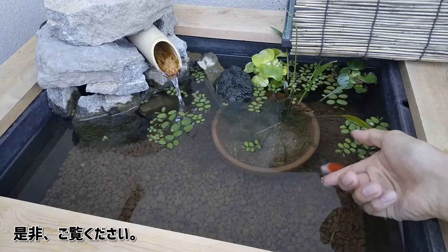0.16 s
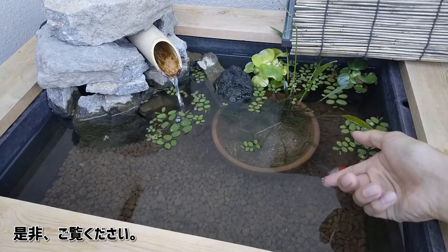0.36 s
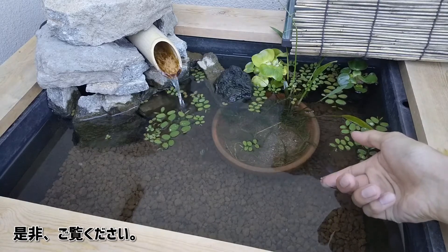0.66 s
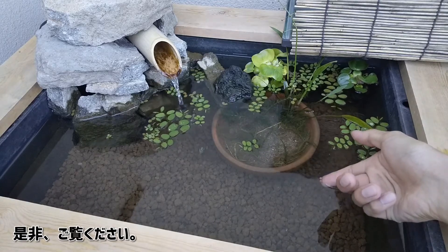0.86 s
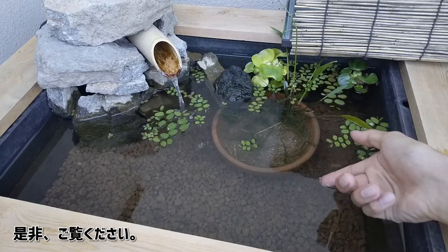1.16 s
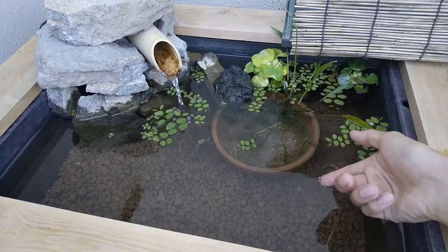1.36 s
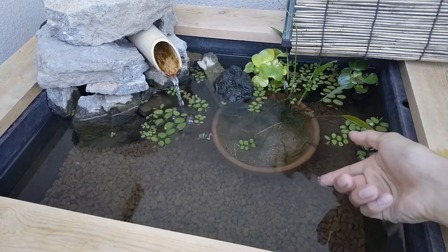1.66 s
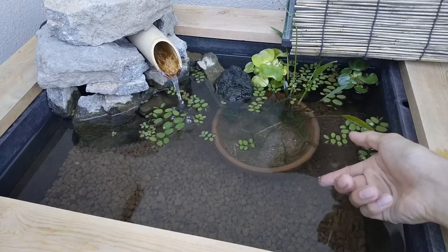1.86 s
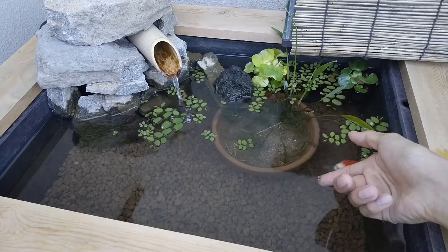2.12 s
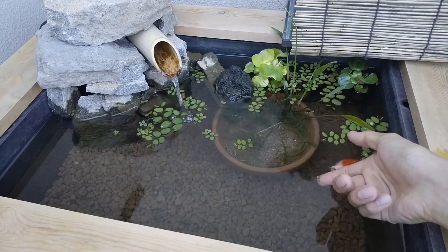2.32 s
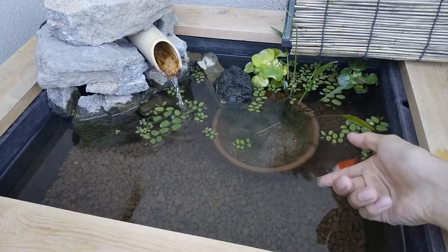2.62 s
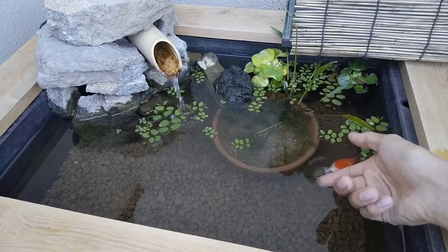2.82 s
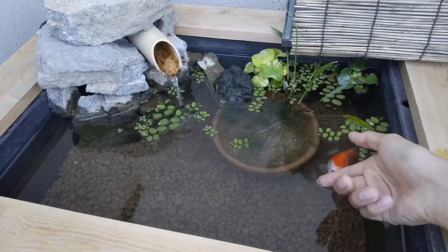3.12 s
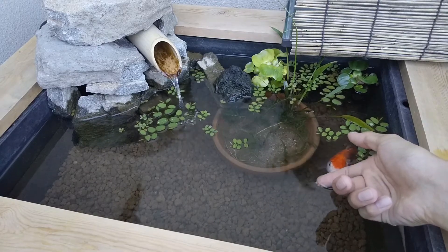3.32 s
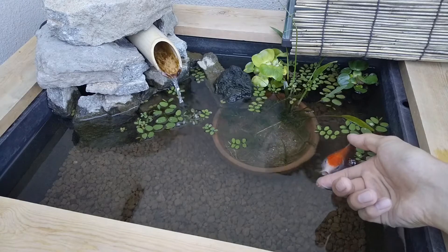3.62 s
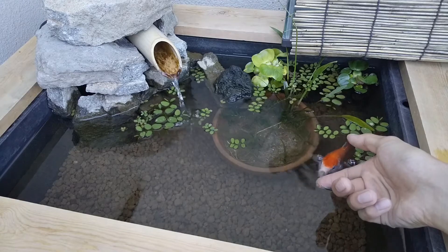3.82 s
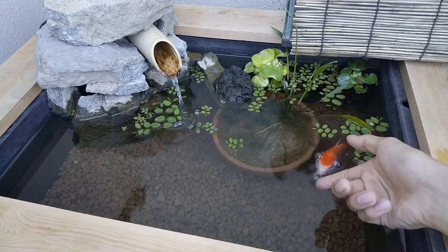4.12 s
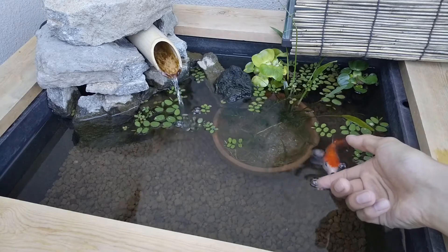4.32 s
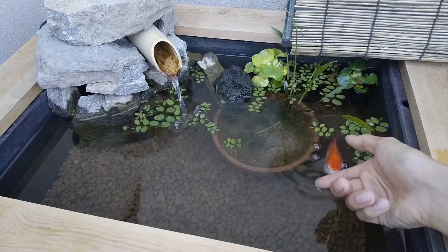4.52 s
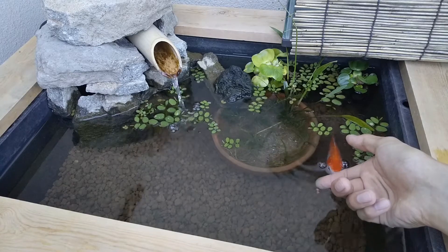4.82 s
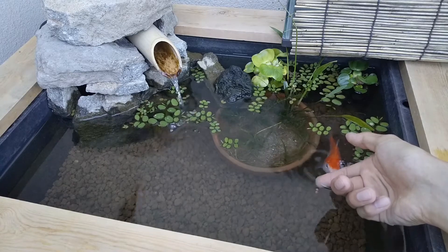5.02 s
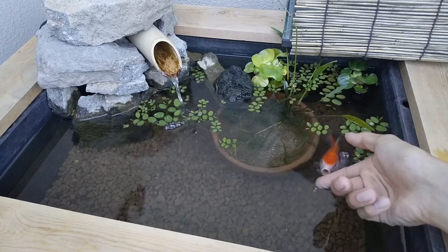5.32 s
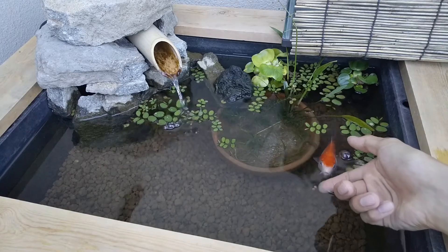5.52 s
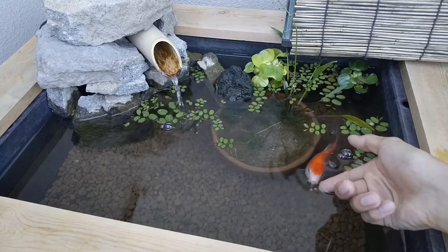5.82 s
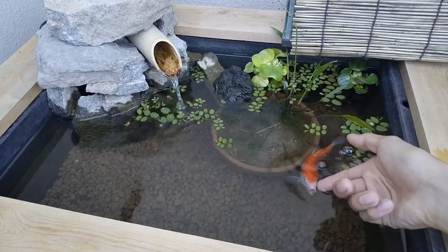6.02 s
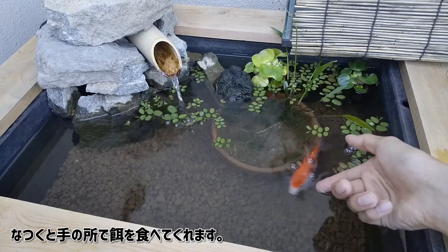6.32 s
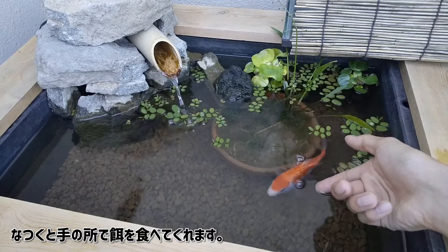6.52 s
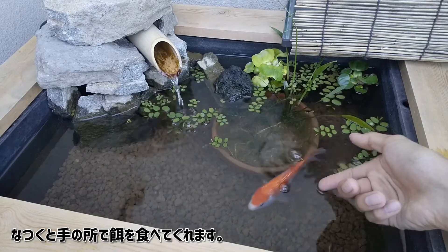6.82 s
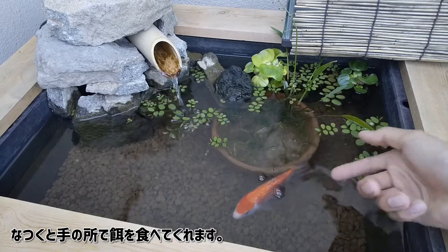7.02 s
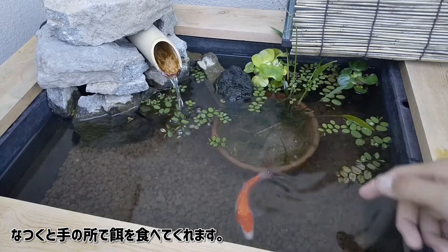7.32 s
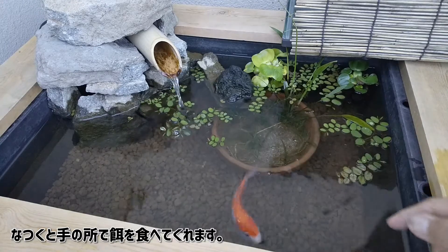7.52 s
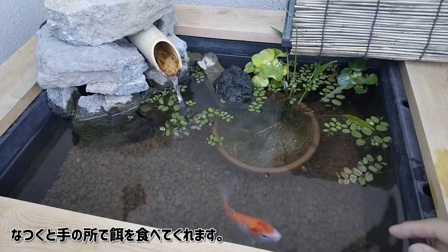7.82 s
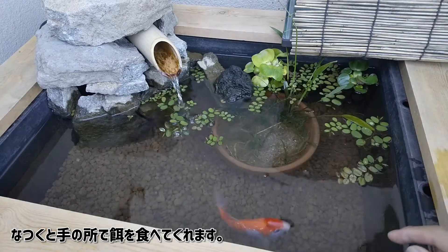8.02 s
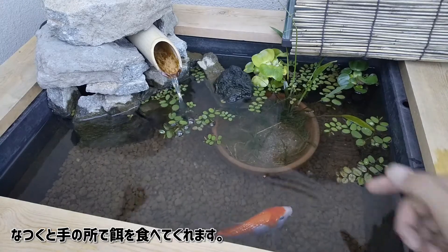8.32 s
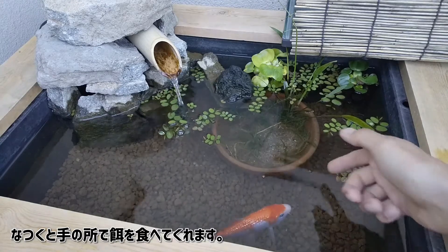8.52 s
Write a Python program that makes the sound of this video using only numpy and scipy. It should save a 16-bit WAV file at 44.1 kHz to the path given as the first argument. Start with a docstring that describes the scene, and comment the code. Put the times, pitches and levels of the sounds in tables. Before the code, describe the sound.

Close to a small garden pond, a thin stream falls continuously from a spout, with bright ringing bubble plinks, tiny wet snaps and fine spray. A deep machine hum and wind rumble lie underneath. Around the middle, a gust hits the microphone with a heavy low thump while a faint far-off vehicle accelerates and changes gear. The water never stops; wind pulses return towards the end.

```python
"""Garden pond under a spout

Close by, a thin stream falls into a small pond: ringing bubbles plink, noise bursts make snaps and spray.
Two floating bubbles burst; resonances and noise-like echo tails stand for hollows, pond walls and yard.
A nearby machine hums in sines; shaped noise and slow pulses buffet the microphone, once with a thump.
Far off, a vehicle made of engine orders accelerates and changes gear over filtered outdoor noise."""
import sys
import numpy as np
from scipy import signal
from scipy.fft import rfft, irfft, next_fast_len
from scipy.io import wavfile
from scipy.ndimage import map_coordinates

SR = 44100
rng = np.random.default_rng(int(sys.argv[2]) if len(sys.argv) > 2 else 0)


def output_pcm(signal):
    """Save a mono or channel-first signal as 16-bit PCM at the path in sys.argv[1].

    Samples are clipped to [-1, 1] before scaling.
    """
    pcm = np.clip(np.atleast_2d(signal).T, -1, 1) * 32767
    wavfile.write(sys.argv[1], SR, np.round(pcm).astype(np.int16))


N = 381906  # length in samples


def amp(db):
    """Amplitude factor of a level in dB."""
    return 10 ** (np.asarray(db) / 20)


def unit(x):
    """x at rms 1."""
    return x / np.sqrt(np.mean(x ** 2) + 1e-20)


def along(points, hz):
    """Value at hz, interpolated between (f/Hz, value) points on a log frequency axis."""
    f, value = np.transpose(points)
    return np.interp(np.log(hz + 1), np.log(f + 1), value)


def wobble(rate):
    """A smooth random curve with rate knots a second."""
    knots = rng.standard_normal(int(N * rate / SR) + 4)
    return map_coordinates(knots, [np.arange(N) * rate / SR])


def filtered(x, response):
    """x times a response of frequency."""
    m = next_fast_len(N + SR // 2)
    return irfft(rfft(x, m) * response(np.fft.rfftfreq(m, 1 / SR)), m)[:N]


def coloured(x, spectrum):
    """x through a causal filter with this spectrum, at rms 1."""
    m = 2 * next_fast_len(N // 2 + SR // 2)
    gain = amp(along(spectrum, np.fft.rfftfreq(m, 1 / SR)))
    # folding the cepstrum forward in time makes the filter minimum-phase
    cepstrum = irfft(np.log(gain))
    cepstrum[1:m // 2] *= 2
    cepstrum[m // 2 + 1:] = 0
    return unit(irfft(rfft(x, m) * np.exp(rfft(cepstrum)))[:N])


def placed(times, grains):
    """The sum of short sounds, one a row, each started at its time."""
    starts = np.round(np.abs(times) * SR).astype(int)
    index = starts[:, None] + np.arange(grains.shape[1])
    return np.bincount(index.ravel(), grains.ravel(), N)[:N]


def plinks(times, db, hz, t60, rise, onset_cycles, size=1300):
    """Ringing bubbles; each climbs in pitch as it nears the surface."""
    t = np.arange(size) / SR
    hz, age = hz[:, None], t / t60[:, None]
    pitch = hz * (1 + rise * (np.minimum(age, 1) - 1 / 8))
    phase = 2 * np.pi * np.cumsum(pitch, axis=1) / SR
    decay = np.exp(-np.log(1000) * age)
    shape = decay * (1 - np.exp(-t * hz / onset_cycles))
    shape /= shape.max(axis=1, keepdims=True)
    return placed(times, amp(db)[:, None] * shape * np.sin(phase))


def snaps(times, db, t60, size=400):
    """Tiny decaying bursts of noise where the surface breaks."""
    decay = np.exp(-np.log(1000) * np.arange(size) / SR / t60)
    return placed(times, amp(db)[:, None] * decay * rng.standard_normal((len(times), size)))


def spread_times(count):
    """Random moments without long pauses, as the stream never stops."""
    return (np.arange(count) + rng.random(count)) / count * N / SR


def splash_times(blobs, count, spread):
    """Moments just after randomly chosen falling blobs, spread seconds later on average."""
    return rng.choice(blobs, count) + rng.exponential(spread, count)


# colour of the distant background: f/Hz, relative level/dB
OUTDOOR_COLOUR = [(41, -24), (70, -0.5), (83, -12), (102, -16.5), (163, -17.5), (291, -18.5), (678, -28),
                  (1160, -30), (1790, -36), (2540, -38.5), (3190, -45), (4000, -41), (6050, -51),
                  (7910, -55.5), (9730, -59), (12600, -90), (21400, -120)]


def outdoors():
    """The steady murk of distant traffic and air: coloured noise with a slight waver."""
    level_db = -56.5 + 0.92 * wobble(3.15)
    return amp(level_db) * coloured(rng.standard_normal(N), OUTDOOR_COLOUR)


# resonances of the exhaust: f/Hz, relative level/dB
EXHAUST_COLOUR = [(120, -29), (178, -8), (205, -9), (220, 3.5), (265, -15.5), (315, -6), (360, 1),
                  (395, -7.5), (440, -27)]
PASS_S, PASS_DB, PASS_FADE_DB = 4.88, -59, 13  # nearest moment, gain there, loss one second away
SHIFT_S, SHIFT_HALF_S, SHIFT_DIP_DB = 4.965, 0.12, 17  # middle of the gear change, half its span, dip there
# engine cycle rate in Hz and its climb in Hz/s, each gear's line taken at the middle of the change
LOW_GEAR_HZ, LOW_GEAR_HZ_PER_S = 46.05, 4.4
HIGH_GEAR_HZ, HIGH_GEAR_HZ_PER_S = 34.87, 1.599


def vehicle():
    """A far engine climbs, shifts up with the throttle shut and climbs again; orders slide through resonances."""
    t = np.arange(N) / SR
    since = t - SHIFT_S
    shifted = np.clip(.5 + since / SHIFT_HALF_S / 2, 0, 1)
    low_gear = LOW_GEAR_HZ + LOW_GEAR_HZ_PER_S * since
    high_gear = HIGH_GEAR_HZ + HIGH_GEAR_HZ_PER_S * since
    rate = (1 - shifted) * low_gear + shifted * high_gear
    passing_db = PASS_DB - PASS_FADE_DB * (t - PASS_S) ** 2
    dip_db = SHIFT_DIP_DB * np.exp(-(since / SHIFT_HALF_S) ** 2)
    phase = 2 * np.pi * np.cumsum(rate) / SR
    orders = np.zeros(N)
    for k in range(4, 13):
        order_db = along(EXHAUST_COLOUR, k * rate) + 1.2 * wobble(7)
        orders += amp(order_db) * np.sin(k * phase + rng.uniform(0, 2 * np.pi))
    return amp(passing_db - dip_db) * orders


# lines of the machine: f/Hz, rms level/dB before the slow swing and random waver
HUM_LINES = [(41.8, -48.5), (55.3, -46), (98.3, -69), (119.8, -64), (418, -85.5)]
# slow swing of the hum, which sinks and recovers: t/s, gain/dB
HUM_SWING = [(0, 0.5), (3.2, -3), (4.1, -5.5), (5.5, -2), (8.66, 0)]


def machine():
    """Slightly unsteady sine lines from nearby; the two lowest beat against each other."""
    swing_db = np.interp(np.arange(N) / SR, *np.transpose(HUM_SWING))
    lines = np.zeros(N)
    for hz, db in HUM_LINES:
        level = amp(db + 2.15 * wobble(3.029))
        phase = 2 * np.pi * np.cumsum(hz + 0.303 * wobble(2.07)) / SR
        lines += level * np.sin(phase)
    return np.sqrt(2) * amp(swing_db) * lines


# colour of wind noise at the microphone: f/Hz, relative level/dB
BUFFET_COLOUR = [(6, 13.5), (14, 5), (25, 5.5), (40, -13.5), (65, -14), (100, -27.5), (200, -49.5),
                 (500, -95), (1500, -140)]
# gusts: t/s of the peak, relative level/dB there, time/s to swell or die by about 9 dB
GUST_SWELLS = [(2.409, -33, 0.0051), (2.93, -34, 0.14), (5.04, -27.5, 0.18), (5.55, -38, 0.6),
               (7.12, -32, 0.28), (8.17, -31, 0.33), (8.48, -28, 0.43)]
# single eddies that hit the microphone: t/s, peak level/dB before the ripples, main f/Hz
EDDIES = [(2.372, -29.5, 51), (2.399, -23.5, 21), (4.966, -20, 15), (5, -19, 48), (5.033, -26.5, 82),
          (5.0322, -42, 300), (5.035, -16.5, 172), (5.109, -19, 27), (5.289, -28, 22), (7.11, -41, 104),
          (7.592, -22.5, 38), (8.153, -19, 30), (8.186, -25.5, 80), (8.49, -32.5, 68)]
CALM_DB = -46  # the breeze between gusts, on the same scale as the gusts
EDDY_RAGGED, EDDY_RIPPLES = 0.03, 3  # depth of the ripples on an eddy; ripple knots per cycle of it


def wind():
    """Noise gusts over a light breeze; an eddy is a ragged dip of pressure between two pushes."""
    t = np.arange(N) / SR
    gusts = [amp(db) * np.exp(-np.abs(t - s) / swell) for s, db, swell in GUST_SWELLS]
    strength = np.hypot(amp(CALM_DB), np.linalg.norm(gusts, axis=0))
    buffet = amp(6) * strength * coloured(rng.standard_normal(N), BUFFET_COLOUR)
    eddies = np.zeros(N)
    for s, db, hz in EDDIES:
        square = (np.pi * hz * (t - s)) ** 2
        ripples = 1 + EDDY_RAGGED * wobble(EDDY_RIPPLES * hz)
        eddies += amp(db) * (2 * square - 1) * np.exp(-square) * ripples
    return buffet + eddies


# moment, peak level, time scales of swell and release
THUMP_S, THUMP_DB, THUMP_RISE_S, THUMP_FALL_S = 5.029, -7.5, 0.019, 0.0433


def thump():
    """The strongest gust shoves the microphone: one slow pressure pulse with shallow suction around it."""
    since = np.arange(N) / SR - THUMP_S
    square = (since / np.where(since < 0, THUMP_RISE_S, THUMP_FALL_S)) ** 2
    return amp(THUMP_DB) * (2 * np.exp(-square) - np.exp(-square / 2 ** 2))


def scattered(x, t60, gap, count=12, size=5000):
    """Surfaces scatter sound into noise-like tails; their pattern shifts as the stream wanders."""
    t = np.arange(size) / SR
    envelope = np.exp(-np.log(1000) * t / t60) * (1 - np.exp(-t / gap))
    tails = rng.standard_normal((count, size)) * envelope
    tails /= np.linalg.norm(tails, axis=1, keepdims=True)
    # crossfade from each tail to the next
    position = np.linspace(0, count - 1, N)
    shares = np.maximum(1 - np.abs(position - np.arange(count)[:, None]), 0)
    return signal.fftconvolve(shares * x, tails, axes=1).sum(axis=0)[:N]


# resonances between the stones: f/Hz, width/Hz, gain level/dB of each at its centre
STONE_HOLLOWS = [(1050, 47, -10), (1426, 130, -2.5), (1613, 70, 0.5), (1948.5, 39, 2.5), (2540, 84, -1),
                 (3000, 55, -3), (3416, 110, -1.5), (4010, 150, -4), (4470, 130, -6), (6470, 51, -5),
                 (7260, 73, -6), (7762, 96, -7.5), (8600, 54, -3)]


def hollows(x):
    """Hollows between the stones ring with every splash: the same few resonances colour all the water."""
    def response(f):
        total = 0
        for hz, width, db in STONE_HOLLOWS:
            damping = 1j * f * width
            total = total + amp(db) * damping / (hz * hz - f * f + damping)
        return total
    return filtered(x, response)


# floating bubbles that burst: t/s, level/dB before a 4 dB lift and the colour below
FILM_BURSTS = [(6.6927, -56), (7.324, -51.5)]
# colour of a bursting film: f/Hz, gain level/dB
FILM_COLOUR = [(9000, -40), (11500, -17), (12300, 3), (14500, -5), (15500, -5)]


def pops():
    """The film of a floating bubble tears with a tiny, very high tick."""
    s, db = np.transpose(FILM_BURSTS)
    ticks = snaps(s, db + 4.0, t60=.02)
    return filtered(ticks, lambda hz: amp(along(FILM_COLOUR, hz)))


# quick runs of bubbles: t/s, length/s, first f/Hz, last f/Hz, level/dB; pitch and level then scatter
GURGLE_RUNS = [(0.034, .036, 1230, 2800, -50), (.22, .058, 2950, 3870, -57.5),
               (.298, .016, 1850, 3030, -58.5), (0.952, 0.0672, 1246, 1570, -60)]


def gurgles(count=10):
    """A trapped pocket of air sheds bubbles that tend smaller and higher, in uneven steps."""
    s, length, first_hz, last_hz, db = np.transpose(GURGLE_RUNS)
    jitter = rng.normal(0, 0.025, (count, len(s)))
    progress = np.clip(np.linspace(0, 1, count)[:, None] + jitter, 0, 1)
    scatter = np.exp(rng.normal(0, .065, progress.shape))
    hz = (first_hz * (last_hz / first_hz) ** progress * scatter).ravel()
    levels = (db + rng.normal(0, 1.1, progress.shape)).ravel()
    times = (s + length * progress).ravel()
    return plinks(times, levels, hz, np.full(len(hz), .018), rise=0.14, onset_cycles=0.56)


# colour of fine spray, also of the droplets' slaps: f/Hz, relative level/dB
SPRAY_COLOUR = [(1200, -3.5), (4000, -0.5), (6100, -3), (7200, 4.5), (8000, 6), (8500, -2), (9700, -6),
                (11000, -16.5), (13000, -18), (15000, -39)]


def spray(blobs, count=1300):
    """Each falling blob can start a tight patter of noise ticks; the froth fizzes on as wavering noise."""
    db = 10.4 * np.minimum(rng.standard_normal(count), 2)
    patter = unit(snaps(splash_times(blobs, count, spread=.002), db, t60=0.0087))
    fizz = amp(-11.0 + 2.1 * wobble(16)) * rng.standard_normal(N)
    return amp(-75.5) * coloured(patter + fizz, SPRAY_COLOUR)


# colour of the surface breaking, also under the loud bubbles: f/Hz, level/dB
BREAK_COLOUR = [(600, -19), (1300, -5), (2500, -1), (4200, 3), (6100, -6.5), (7700, -6), (9000, -17.5),
                (11000, -25), (15000, -38)]


def splashes(blobs, count=700):
    """Tiny wet slaps among the small bubbles: short noise bursts after the blobs."""
    db = 6 * np.minimum(rng.standard_normal(count), 2)
    slaps = snaps(splash_times(blobs, count, spread=.003), db, t60=0.0096)
    return amp(-78) * coloured(slaps, BREAK_COLOUR)


# colour of the countless small bubbles: f/Hz, relative level/dB
TRICKLE_COLOUR = [(450, -20.5), (800, 6.5), (1400, 1), (1750, -3.5), (2250, -0.5), (2550, 1.5), (2950, -8),
                  (3400, -1.5), (4000, -0.5), (4900, -1.5), (6100, -9.5), (7600, -19), (8600, -23),
                  (11000, -19)]


def trickle(blobs, count=3400):
    """Countless small bubbles of all sizes merge into a soft wash; large ones tend to ring longer."""
    hz = np.exp(rng.uniform(np.log(750), np.log(9000), count))
    db = 5.6 * np.minimum(rng.standard_normal(count), 1.9) + 3.3 * np.log2(hz / 1000)
    t60 = 0.021 * (hz / 1000) ** -.45 * np.exp(0.47 * rng.standard_normal(count))
    times = splash_times(blobs, count, spread=.014)
    bubbles = plinks(times, db, hz, t60, rise=0.12, onset_cycles=0.27, size=800)
    return amp(-71) * coloured(bubbles, TRICKLE_COLOUR)


# loudest droplets on the surface: t/s, nominal peak level/dB, f/Hz of the trapped air
LOUD_DROPLETS = [(0.7235, -46.5, 7200), (1.059, -42, 7900), (1.092, -47.5, 7900), (1.3571, -38.5, 8090),
                 (1.498, -47.5, 7630), (1.5449, -45.5, 7280), (1.8758, -41, 7860), (3.058, -39.5, 8030),
                 (3.1073, -46, 7400), (3.4197, -48.5, 7200), (3.4705, -41.5, 7800), (3.6308, -47.5, 7850),
                 (3.76, -42.5, 7940), (4.239, -39.5, 7690), (4.5167, -40, 7300), (4.9433, -43, 7760),
                 (5.697, -39, 7780), (5.831, -48, 8100), (5.9606, -43.5, 7700), (6.003, -47, 7800),
                 (6.5859, -48, 7860), (6.7371, -49.5, 7560), (7.3204, -47, 7690), (7.5191, -46, 7400),
                 (7.5497, -45, 7710), (8.398, -46, 9070), (8.5954, -48.5, 7900)]
DROPLET_HZ, DROPLET_SCATTER = 7620, 0.0437  # typical pitch of the lesser ones; share by which it varies
QUIET_DROPLET_DB, QUIET_SPREAD_DB = -57.5, 1.5  # mean nominal level of the lesser ones; its scatter


def droplet_events(count=36):
    """Columns t/s, level/dB, f/Hz: the loudest droplets, then quieter ones at random moments."""
    pitches = DROPLET_HZ * np.exp(DROPLET_SCATTER * rng.standard_normal(count))
    quiet = [spread_times(count), rng.normal(QUIET_DROPLET_DB, QUIET_SPREAD_DB, count), pitches]
    return np.hstack([np.transpose(LOUD_DROPLETS), quiet])


IMPACT_LEAD_S, IMPACT_DB = .0011, -8  # touch comes this long before the slap; its level relative to it


def droplets(s, db, hz):
    """A droplet touches the water, slaps it and traps a pinhead of air that rings."""
    ring = plinks(s, db - .6, hz, t60=np.full(len(s), .01), rise=0.038, onset_cycles=0.58)
    touch = snaps(s - IMPACT_LEAD_S, db + IMPACT_DB, t60=0.0035)
    slap = snaps(s, db, t60=0.017) + touch
    return ring + amp(-9.0) * np.std(slap) * coloured(slap, SPRAY_COLOUR)


# loudest drips under the stream: t/s, nominal peak level/dB, f/Hz of the bubble
LOUD_BUBBLES = [(.0032, -43.5, 2470), (0.0908, -43.5, 2600), (0.1137, -40, 3480), (0.221, -52, 1590),
                (0.3585, -46, 3140), (0.4176, -45.5, 1160), (.44, -47, 3930), (0.678, -54, 2600),
                (0.722, -55, 1450), (.739, -55, 4020), (0.83, -53, 1690), (0.847, -49, 1410),
                (0.884, -46.5, 2050), (0.9541, -43.5, 1270), (1.004, -45, 1400), (1.061, -54, 1660),
                (1.096, -49, 2480), (1.187, -54, 2600), (1.315, -53, 1490), (1.346, -42, 3100),
                (1.3572, -52, 1440), (1.36, -46, 3620), (1.419, -52, 3570), (1.449, -49, 1210),
                (1.6174, -49, 4510), (1.702, -50, 4020), (1.717, -42.5, 1010), (1.749, -51.5, 2500),
                (1.8764, -47, 4440), (1.9373, -48, 4000), (2.047, -40, 4070), (2.0693, -50.5, 910),
                (2.1132, -49, 2500), (2.1362, -39.5, 4050), (2.204, -49, 2810), (2.291, -53, 3650),
                (2.392, -45, 2160), (2.3977, -45, 1046), (2.66, -53, 1460), (2.6873, -44, 4200),
                (2.763, -51.5, 1010), (3.03, -45, 3460), (3.0594, -52, 1600), (3.1089, -40, 3730),
                (3.113, -45, 3020), (3.12, -39, 4340), (3.1605, -53, 1950), (3.328, -51.5, 3970),
                (3.4708, -43, 4870), (3.5628, -43.5, 930), (3.617, -50, 4479), (3.761, -49, 3216),
                (3.8357, -47.5, 1240), (3.9917, -46.5, 3760), (4.036, -51, 4020), (4.239, -41, 3900),
                (4.302, -54, 1608), (4.3243, -48, 4460), (4.4916, -51.5, 3410), (4.581, -49, 3905),
                (4.7448, -48, 3060), (4.774, -53.5, 1960), (4.836, -54, 2000), (4.9033, -49, 1450),
                (4.9436, -41, 3930), (4.9837, -44, 4940), (5.0253, -40.5, 3850), (5.221, -52.5, 1420),
                (5.2966, -39.5, 4000), (5.4668, -47, 3120), (5.5519, -43, 1100), (5.562, -45, 1290),
                (5.674, -49.5, 815), (5.8706, -50, 2550), (5.9502, -48.5, 1910), (5.9832, -51, 4020),
                (6.0943, -52, 3430), (6.137, -49, 3790), (6.332, -51, 4709), (6.4155, -46, 1593),
                (6.478, -51.5, 3060), (6.496, -53, 1620), (6.599, -53.5, 1590), (6.7914, -49, 1410),
                (6.862, -48, 3983), (6.8769, -44.5, 3430), (6.9026, -49.5, 1426), (7.0, -47, 3480),
                (7.192, -47, 3900), (7.2068, -48.5, 2510), (7.5196, -49, 2570), (7.5507, -49, 3080),
                (7.792, -50.5, 4200), (7.843, -46.5, 2436), (7.9162, -52.5, 3400), (8.189, -51, 1510),
                (8.2104, -49, 1030), (8.317, -52.5, 1580), (8.347, -47.5, 4180), (8.5432, -49, 4530),
                (8.5965, -48, 2600)]
# heaviest blobs that smack the surface: t/s, level/dB before the smack gain and colour
HEAVY_SMACKS = [(.3579, -50), (.883, -52), (1.3566, -51), (2.392, -46), (3.1083, -47), (3.12, -46),
                (3.7496, -50), (3.8357, -51), (4.239, -53), (4.9438, -58), (5.0245, -57), (5.2968, -57),
                (5.697, -56), (6.1741, -49.5), (7.5189, -49), (7.5505, -52), (7.8434, -53), (7.8995, -47)]
RING_T60_S, RING_SLOPE = .029, -0.77  # typical ring of a 1 kHz bubble; power of pitch for its length
# gain of a smack; level of a bubble pinching off, before colour; decay of both
SMACK_GAIN_DB, PINCH_DB, SNAP_T60_S = 6, -55, 0.015


def loud_bubbles(s, db, hz):
    """Each bubble pinches off with a light snap and rings, low ones longer; heavy blobs snap hard."""
    t60 = RING_T60_S * (hz / 1000) ** RING_SLOPE * np.exp(0.15 * rng.standard_normal(len(s)))
    ring = plinks(s, db - 0.88, hz, t60, rise=0.035, onset_cycles=0.23)
    smack_s, smack_db = np.transpose(HEAVY_SMACKS)
    pinches = snaps(s, np.full(len(s), PINCH_DB), SNAP_T60_S)
    smacks = snaps(smack_s, smack_db + SMACK_GAIN_DB, SNAP_T60_S)
    return ring + filtered(pinches + smacks, lambda f: amp(along(BREAK_COLOUR, f)))


YARD_DB, YARD_T60_S = -14, 0.2  # the faint, longer answer of the yard: gain, decay


def scene(count=420):
    """The close water with its echoes, over wind, hum and the world outside."""
    bubbles, drops = np.transpose(LOUD_BUBBLES), droplet_events()
    # the stream breaks into blobs: the loud splashes and many smaller ones between them
    blobs = np.concatenate([bubbles[0], drops[0], spread_times(count)])
    flow = amp(0.97 * wobble(7))
    wash = flow * (trickle(blobs) + splashes(blobs) + spray(blobs))
    water = loud_bubbles(*bubbles) + gurgles() + droplets(*drops) + pops() + wash
    pond = amp(-7.0) * scattered(water, t60=0.06, gap=0.00083)  # rim and stones
    yard = amp(YARD_DB) * scattered(water, t60=YARD_T60_S, gap=.01, count=6, size=11000)
    echoes = pond + hollows(water) + yard
    background = outdoors() + vehicle() + machine() + wind() + thump()
    return (water + echoes + background)[None]


TOP_HZ = 15200  # upper band limit


def record(dry):
    """The microphone channel keeps nothing above its band limit."""
    return filtered(dry[0], lambda hz: hz < TOP_HZ)[None]


dry = scene()
out = record(dry)
output_pcm(out)
```